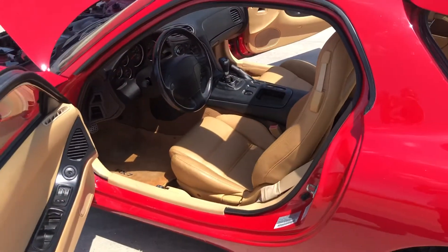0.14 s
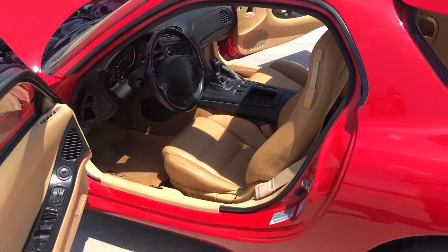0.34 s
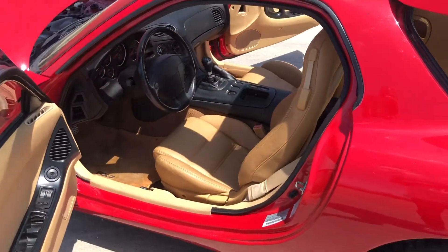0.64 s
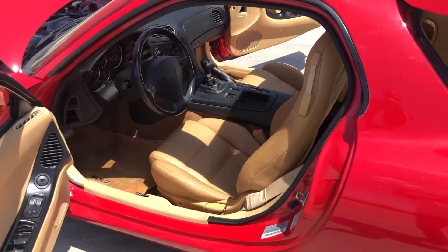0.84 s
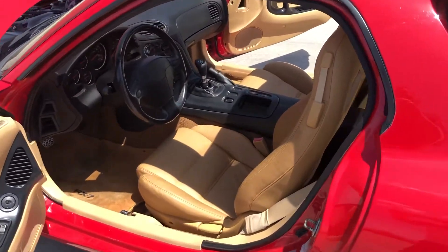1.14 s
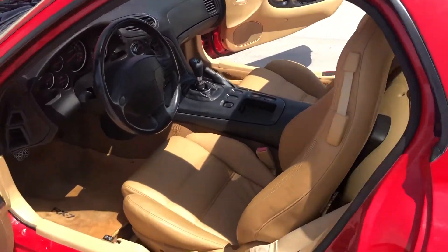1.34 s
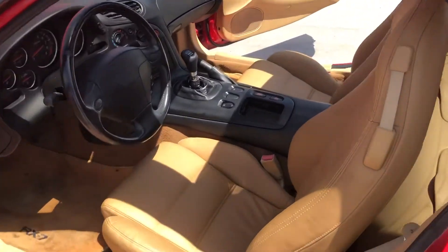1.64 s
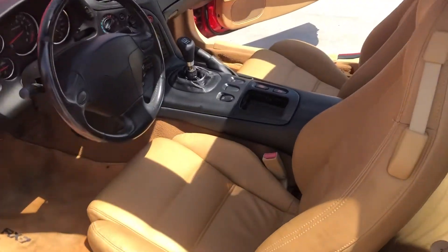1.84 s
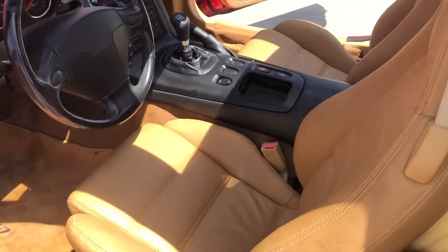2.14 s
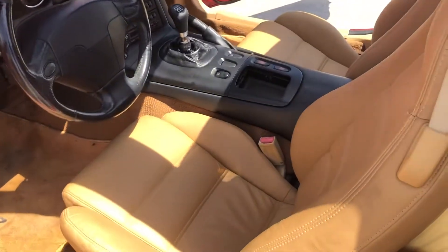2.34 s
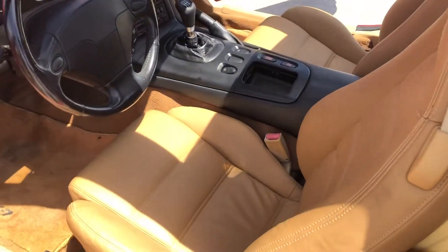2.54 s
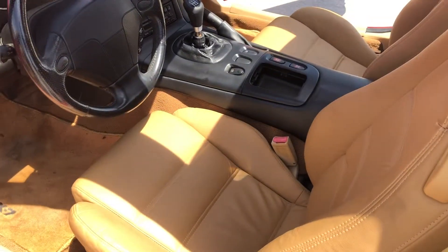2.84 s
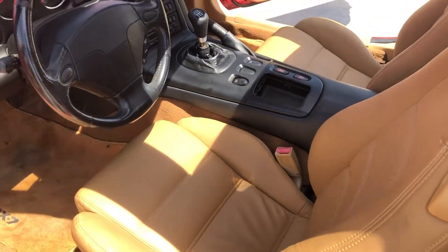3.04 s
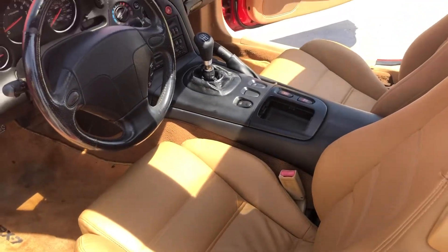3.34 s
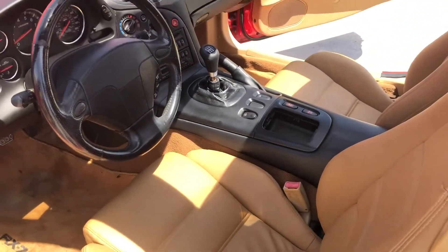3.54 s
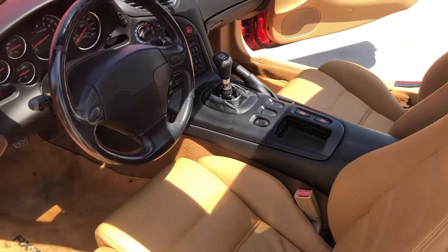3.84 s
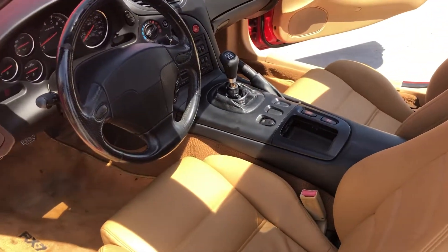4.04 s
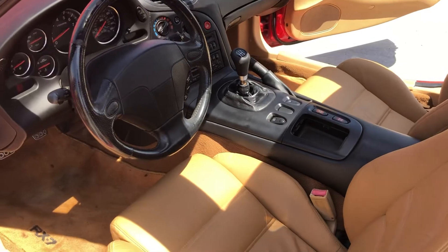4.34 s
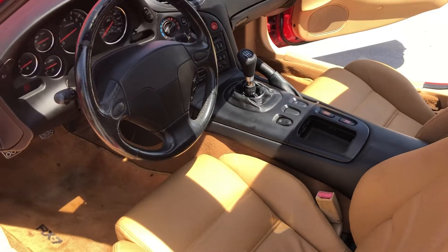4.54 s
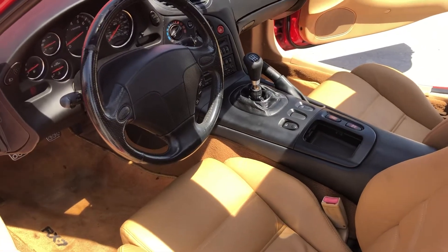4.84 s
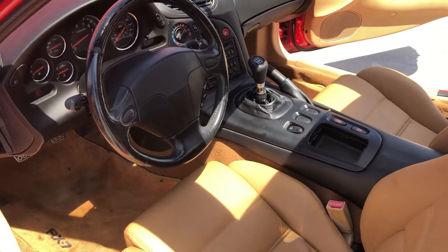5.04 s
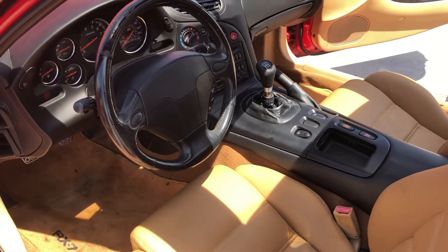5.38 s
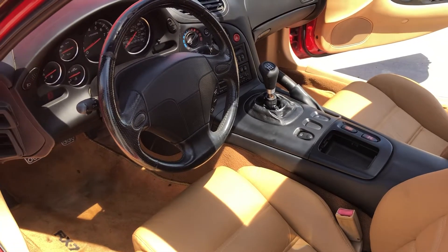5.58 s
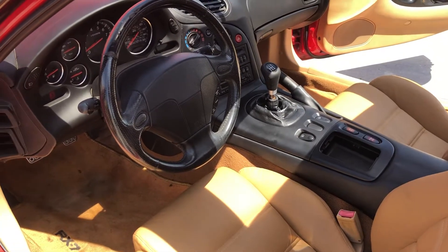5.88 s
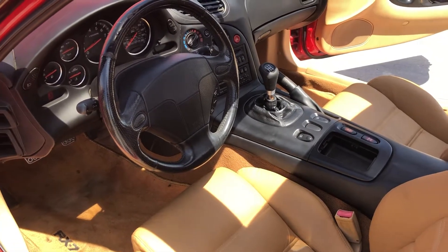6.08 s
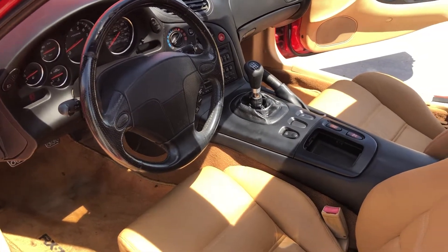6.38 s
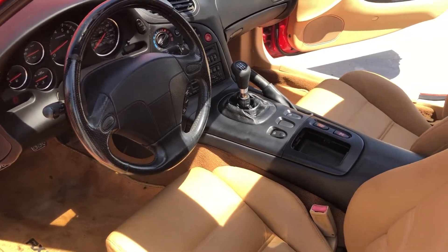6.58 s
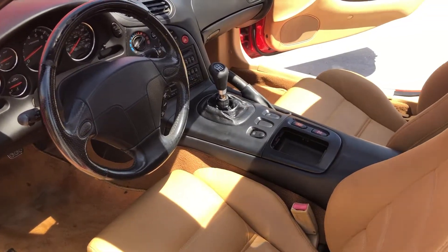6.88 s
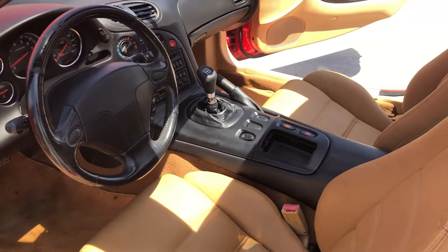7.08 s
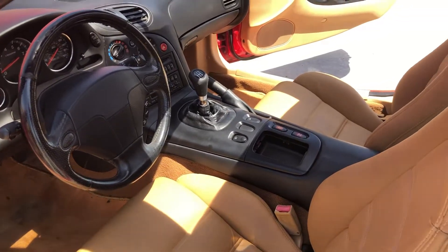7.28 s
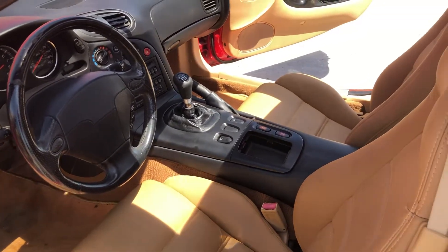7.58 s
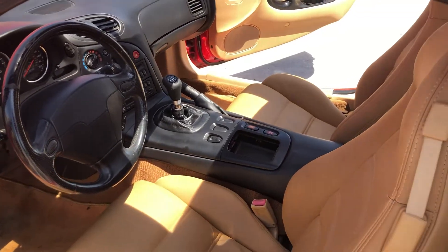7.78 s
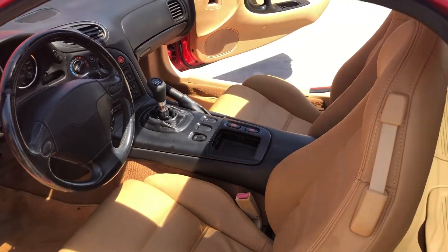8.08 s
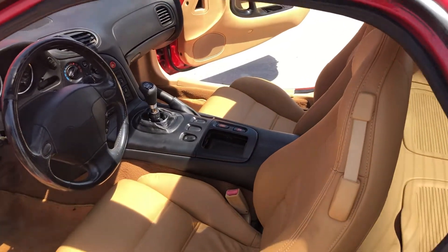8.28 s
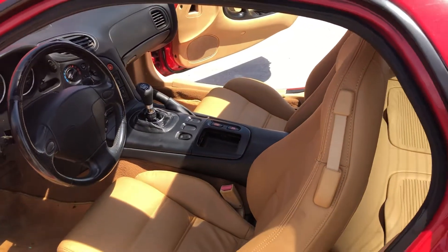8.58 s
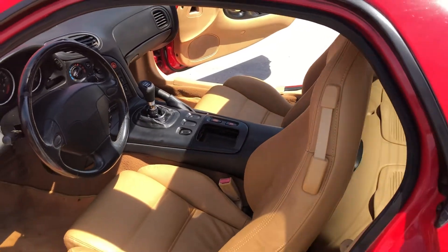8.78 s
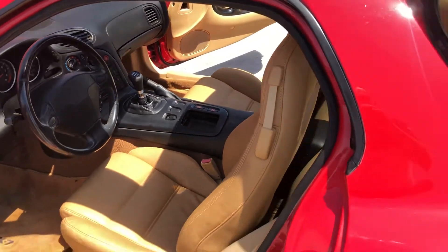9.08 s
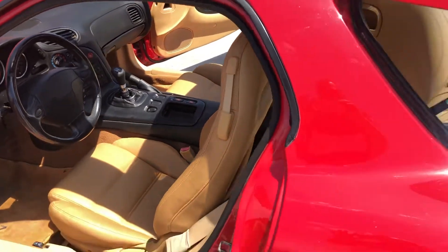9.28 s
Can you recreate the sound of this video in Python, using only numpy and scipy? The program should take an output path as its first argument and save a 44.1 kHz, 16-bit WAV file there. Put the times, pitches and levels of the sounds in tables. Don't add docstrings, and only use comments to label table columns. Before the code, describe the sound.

Lumpy engine idle outdoors, low exhaust pulses growing boomy inside the car, hiss dulling then returning, with wind buffets and a few shoe scuffs.

```python
import sys
import numpy as np
from scipy import signal
from scipy.fft import next_fast_len
from scipy.io import wavfile
from scipy.ndimage import uniform_filter1d

SR = 44100
rng = np.random.default_rng(int(sys.argv[2]) if len(sys.argv) > 2 else 0)


def gain_from_db(level_db):
    decades = np.asarray(level_db, float) / 20
    return 10 ** decades


def store_pcm(level_fs):
    pcm = np.round(np.clip(level_fs, -1, 1) * 32767).astype(np.int16)
    wavfile.write(sys.argv[1], SR, np.atleast_2d(pcm).T)


N = 415422

# time_s, engine_cycles_per_s
IDLE_SPEED = [(0.0, 13.103), (0.44, 12.73), (0.93, 12.805), (1.47, 12.59), (1.75, 12.874), (1.92, 12.872),
              (2.53, 13.02), (3.0, 12.463), (3.18, 12.702), (4.21, 12.796), (4.48, 13.003), (5.23, 12.636),
              (5.75, 12.733), (5.98, 12.949), (6.97, 12.65), (8.4, 12.815), (8.59, 12.629), (9.42, 13.021)]
# time_s, lean (0 outside, 1 inside the cabin)
MIC_LEAN = [(0, 0.089), (.73, .05), (1.3, 0.23), (1.8, 0.74), (2.3, 0.84), (3.5, 1), (5.5, 0.91), (7.5, 1),
            (8.3, 0.81), (8.75, 0.63), (9.3, 0.5), (9.42, 0.34)]


def evened(x):
    return x / np.sqrt(np.mean(x ** 2) + 1e-20)


def curves(rows):
    s, *columns = np.transpose(rows)
    return [np.interp(np.arange(N) / SR, s, c) for c in columns]


def humps(rows):
    t = np.arange(N) / SR
    return sum(db * np.sin(np.pi * np.clip((t - s) / length, 0, 1)) ** 2 for s, length, db in rows)


def read(points, hz):
    f, value = np.transpose(points)
    return np.interp(np.log(hz + 1), np.log(f + 1), value)


def add(mix, s, sound):
    part = mix[max(round(s * SR), 0):][:len(sound)]
    part += sound[:len(part)]


def resonate(x, hz, width_hz):
    turn = np.exp(2j * np.pi * np.cumsum(hz * np.ones(len(x))) / SR)
    r = np.exp(-np.pi * width_hz / SR)
    return 2 * (turn * signal.lfilter([1 - r], [1, -r], x / turn)).real


def resonate_twice(x, hz, width_hz, second_width_hz):
    return resonate(resonate(x, hz, width_hz), hz, second_width_hz)


def noise(colour, patchy_db, size=2048):
    frames, hz = 4 * N // size + 5, np.fft.rfftfreq(size, 1 / SR)
    a, b, patches = rng.standard_normal((frames, len(hz), 3)).T
    patches = uniform_filter1d(patches, size=20, axis=0)
    patches = evened(uniform_filter1d(patches, size=8, axis=1))
    z = (a + 1j * b) * gain_from_db(read(colour, hz)[:, None] + patchy_db * patches)
    return evened(signal.istft(z, nperseg=size, noverlap=size * 3 // 4)[1][:N])


def causal(colour, size=32768):
    log_gain = np.log(gain_from_db(read(colour, abs(np.fft.fftfreq(size, 1 / SR)))))
    return np.fft.ifft(np.exp(np.conj(signal.hilbert(log_gain)))).real[:size // 4]


def bird():
    # start_s, length_s, start_hz, end_hz, level_db
    chirps = [
        (1.14, .05, 3100, 2450, -58),
        (1.195, .04, 3380, 3120, -56),
        (1.33, .055, 3000, 2500, -58),
        (1.388, .035, 3380, 3180, -55),
        (1.53, .09, 3120, 2400, -55),
        (1.62, .038, 3380, 3120, -55),
    ]
    top_s, bend = .012, 1.5
    out = np.zeros(N)
    for s, length, hz0, hz1, db in chirps:
        t = np.arange(round(length * SR)) / SR
        hz = hz0 + (hz1 - hz0) * abs((t - top_s) / (length - top_s)) ** bend
        swell = np.sin(np.pi * t / length) ** 0.59
        add(out, s, gain_from_db(db) * swell * np.sin(2 * np.pi * np.cumsum(hz) / SR))
    return out


def shoes():
    # start_s, length_s, start_hz, end_hz, width_hz, level_db
    scuffs = [
        (.01, 0.036, 5930, 3480, 4000, -45.5),
        (8.256, 0.046, 4500, 4000, 3000, -58),
        (8.364, 0.037, 7000, 5000, 3500, -56),
        (8.781, 0.07, 8500, 5500, 4000, -52),
        (8.808, 0.061, 3500, 3300, 800, -51.5),
        (9.208, .08, 3000, 4500, 5000, -50.5),
    ]
    out, grit = np.zeros(N), rng.standard_normal((len(scuffs), 5000))
    for (s, length, hz0, hz1, width_hz, db), drag in zip(scuffs, grit):
        u = np.linspace(0, 1, round(length * SR))
        centre_hz = hz0 * (hz1 / hz0) ** u
        scrape = evened(resonate_twice(drag[:len(u)], centre_hz, width_hz, width_hz))
        add(out, s, gain_from_db(db) * np.sin(np.pi * u) * scrape)
    return out


def gust_rows():
    # start_s, level_db, middle_hz
    pops = [(0.0, -18.5, 182), (0.089, -24.5, 179), (0.387, -27.5, 187), (0.559, -30, 280),
            (1.375, -32, 210), (1.521, -25, 157), (1.543, -26.5, 220), (1.746, -28, 198), (1.786, -24, 154),
            (1.834, -28, 168), (2.123, -23, 166), (2.378, -22, 174), (2.874, -19.5, 145), (3.066, -33, 242),
            (3.117, -22, 144), (3.146, -23, 207), (3.278, -28, 176), (3.304, -23, 209), (4.453, -23.5, 180),
            (4.534, -23.5, 169), (4.583, -31, 156), (4.732, -26.5, 202), (5.908, -27, 200),
            (5.957, -25.5, 228), (6.725, -23.5, 171), (7.119, -25.5, 187), (7.366, -23, 164),
            (8.524, -25, 151), (8.689, -32, 212), (8.916, -29.5, 191),
            (0.6, -50, 506), (6.694, -32.5, 320), (6.722, -42, 493), (1.805, -31, 260),
             (2.048, -32.5, 250), (2.136, -35, 288), (2.833, -27, 160), (6.263, -32, 300)]
    # start_s, level_db, middle_hz, forerunner_db, lead_s
    slaps = [(0.034, -23, 177.6, -24, .01), (.475, -17, 221, -22, 0.008),
             (2.855, -26.5, 217, -33.5, 0.0064), (3.191, -17, 226, -25.5, 0.0072),
             (3.231, -19, 215, -21, 0.0036), (6.292, -25, 186, -36.5, 0.0129), (9.034, -28, 181, -41, .009),
             (8.948, -43, 263, -36.5, 0.0096)]
    # start_s, length_s, level_db
    flurries = [(.75, 0.49, -31), (1.651, 0.17, -38), (2.034, 0.11, -43), (2.812, 0.045, -37),
                (3.154, 0.054, -26.5), (4.8, 0.13, -38), (5.964, .12, -39), (6.148, 0.11, -32),
                (7.201, 0.37, -33), (8.601, 0.33, -36)]
    fore_pitch = 1.293
    eddy_hz, eddy_spread, eddy_spread_db = 185, .12, 2.5
    rows = pops
    rows += [(s, db, hz) for s, db, hz, _, _ in slaps]
    rows += [(s - lead, db, hz * fore_pitch) for s, _, hz, db, lead in slaps]
    when, sizes = rng.random((len(flurries), 2)), rng.standard_normal((len(flurries), 2, 2))
    for (s, length, db), places, lucks in zip(flurries, when, sizes):
        for half, (place, (size, pitch)) in enumerate(zip(places, lucks)):
            start_s = s + length * (half + place) / 2
            rows.append((start_s, db + eddy_spread_db * size, eddy_hz * np.exp(eddy_spread * pitch)))
    return rows


def wind():
    rise_cycles = 1.44
    crest_share, crest_db_per_db = 0.23, 0.8
    out, wake_level = np.zeros(N), np.zeros(N)
    t, gusts = np.arange(2000) / SR, gust_rows()
    luck = rng.random((len(gusts), 2))
    wake = noise([(40, -20), (80, 0), (180, -5), (350, -25), (700, -60)], 2.5)
    for (s, db, hz), (turn, spread) in zip(gusts, luck):
        falling_hz = hz * (0.396 + 2.175 * np.exp(-t / 0.00484))
        angle = 2 * np.pi * (np.cumsum(falling_hz) / SR + turn)
        peak_s = rise_cycles / hz + .001 * spread
        shape = (t / peak_s * np.exp(1 - t / peak_s)) ** 2
        crest = crest_share * gain_from_db(crest_db_per_db * (db + 16.5))
        swirl = np.sin(angle) + crest * (np.cos(2 * angle) - .5 * np.sin(3 * angle))
        add(out, s, gain_from_db(db + 2) * shape * swirl)
        add(wake_level, s - .01, gain_from_db(db - 17) * signal.windows.hann(len(t)))
    return out + wake_level * wake


def panels(x):
    taps = np.zeros(1500)
    at = rng.integers(30, 700, size=12)
    taps[at] = rng.choice([-1., 1.], size=12) * gain_from_db(-26 - 200 * at / SR)
    taps[0] = 1
    return signal.oaconvolve(x, taps / np.linalg.norm(taps))[:N]


def air_puffs(turns, hiss_db):
    # hz, level_db
    puff_colour = [(3000, -40), (7500, 1), (8650, 1), (9100, -2), (9570, -2), (10100, -10), (12000, 2.5),
                   (13000, -3), (14700, 0), (16000, -1.5)]
    whistle_hz, whistle_fall_hz, whistle_width_hz, whistle_db = 9700, 2100, 680, -29.5
    since, other = (turns - .14) % 1, (turns - .7) % 1
    puff = (since * np.exp(-since / .16)) ** 2
    echo = (other * np.exp(-other / .16)) ** 2
    strength = gain_from_db(.7 * rng.standard_normal(200))[np.floor(turns - .14).astype(int) + 1]
    breath = (puff * strength + 0.47 * echo) * noise(puff_colour, 0.45, size=512)
    leak = resonate(rng.standard_normal(N), whistle_hz - whistle_fall_hz * since, whistle_width_hz)
    whistle = gain_from_db(0.72 * hiss_db + whistle_db) * evened(puff * strength * leak)
    return gain_from_db(0.7 * hiss_db - 27) * evened(breath) + whistle


def accessory_hums(lean):
    # centre_hz, width_hz, level_db
    hum_modes = [(294.7, 17.5, -54), (449, 38, -63), (636, 34, -57.5), (5990, 180, -88)]
    total = np.zeros(N)
    for hz, width_hz, db in hum_modes:
        total += gain_from_db(db) * evened(resonate_twice(rng.standard_normal(N), hz, width_hz, 3 * width_hz))
    return gain_from_db(3.5 * (lean - 0.66)) * total


def electric_whine():
    # start_s, length_s, rise_db
    surges = [
        (6., 2.4, 1.5),
        (8.86, .36, 12),
        (9.3, .26, 11),
    ]
    t = np.arange(N) / SR
    waver = np.cumsum(rng.standard_normal(N)) * 0.0223
    alternator_db = -69 + .3 * t + humps(surges)
    alternator = gain_from_db(alternator_db) * np.sin(2 * np.pi * 2320 * t + waver)
    return alternator + gain_from_db(-73) * np.sin(2 * np.pi * 2680 * t - waver)


def bay(turns):
    # hz, level_db_per_hz
    roar_colour = [(120, -3), (200, -0.5), (300, -4), (361, -7.5), (457, -4), (640, -6.5), (710, -6),
                   (1000, -4), (1300, -7.5), (1600, -11), (1900, -16.5), (2600, -23), (4000, -31.5),
                   (6000, -100)]
    # hz, level_db_per_hz
    hiss_colour = [(1000, -4.5), (1800, 0.5), (2900, 0), (4400, 1), (5600, 0), (7000, -3.5), (9000, -6.5),
                   (10500, -7), (13500, -13), (16000, -33)]
    # hz, level_db_per_hz
    rumble_colour = [(25, -30), (40, -19), (60, 10.5), (110, 5), (170, 9), (230, -45), (320, -40)]
    lean = np.maximum(curves(MIC_LEAN)[0], 0)
    roar_db = -42 - 1.5 * lean
    hiss_db = -52.5 - 5.5 * lean ** 1.74
    throb_db = 1.1 * np.cos(4 * np.pi * (turns + .02))
    roar, hiss = noise(roar_colour, 1.1), noise(hiss_colour, .8)
    steady = gain_from_db(roar_db) * roar + gain_from_db(hiss_db - 1 + throb_db) * hiss
    steady += gain_from_db(-44.3) * noise(rumble_colour, 2.2)
    fan_hz, fan_width_hz = 1510, 220
    fan = gain_from_db(-58.5 - 20.5 * lean) * evened(resonate(roar, fan_hz, fan_width_hz))
    return steady + fan + air_puffs(turns, hiss_db) + accessory_hums(lean) + electric_whine()


def exhaust(turns):
    # hz, gain_db
    pipe_colour = [(20, -78), (38, -15.5), (51, 4.5), (77, 5), (102, 1), (128, 1), (153, -4), (180, -21.5),
                   (215, -29.5), (300, -29.5), (420, -45), (1200, -120)]
    # start_s, length_s, depth_db
    ducks = [
        (-.05, 0.33, -6.5),
        (.41, 0.31, -7.5),
        (3.2, 0.16, -3.5),
        (5.8, 0.094, -2.5),
    ]
    lean, duck_db = curves(MIC_LEAN)[0], humps(ducks)
    pipe_db = -29 + 2.5 * lean + duck_db
    boom_db = -51.5 + 17.5 * lean + duck_db
    firings = 2 * (turns - .096)
    at = np.flatnonzero(np.diff(np.floor(firings)) > 0)
    luck = rng.standard_normal((len(at), 2))
    second = np.floor(firings[at + 1]) % 2
    late_s = .0004 * luck[:, 0] - .0004 * second
    late = np.round(SR * late_s).astype(int)
    pulses = np.zeros(N)
    pulses[np.clip(at + late, 0, N - 1)] = gain_from_db(1.1 * luck[:, 1] - 1.6 * second)
    pipe = signal.oaconvolve(pulses, causal(pipe_colour))[:N]
    analytic = signal.hilbert(pipe, next_fast_len(N + SR // 4))[:N]
    pipe = (analytic * np.exp(1j)).real
    third_hz = 6 * curves(IDLE_SPEED)[0]
    boom = resonate_twice(pipe, third_hz, 15, 15)
    return gain_from_db(pipe_db) * evened(pipe) + gain_from_db(boom_db) * evened(boom)


def scene():
    turns = -.17 + np.cumsum(curves(IDLE_SPEED)[0]) / SR
    return (bird() + shoes() + wind() + panels(bay(turns)) + exhaust(turns))[None]


def band_limit(x):
    return signal.sosfilt(signal.butter(12, 15990, fs=SR, output="sos"), x)


def record(dry):
    cut = signal.sosfilt(signal.butter(4, 36, "high", fs=SR, output="sos"), dry)
    top_edge = signal.firwin(1023, 15720, window=("kaiser", 9), fs=SR)
    cut = signal.oaconvolve(cut, top_edge[None], "same")
    cut = cut * np.minimum(np.arange(N)[::-1] / 60, 1)
    return band_limit(cut)


dry = scene()
out = record(dry)
store_pcm(out)
```